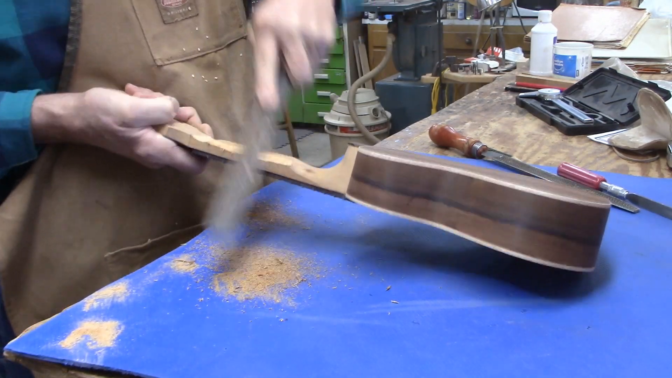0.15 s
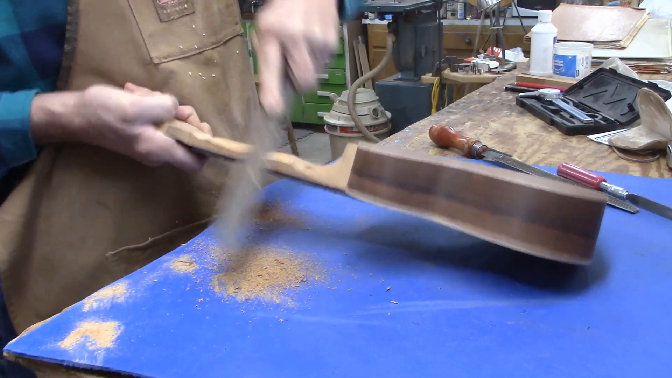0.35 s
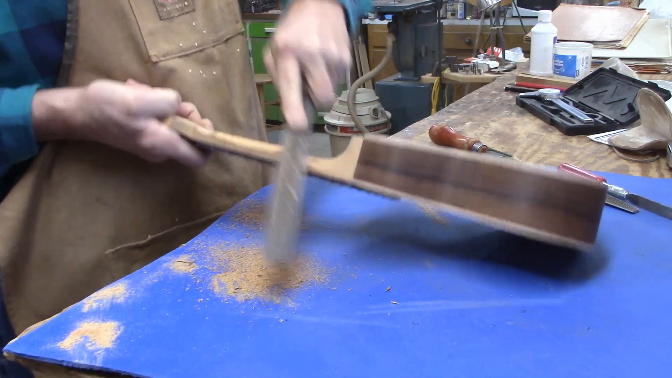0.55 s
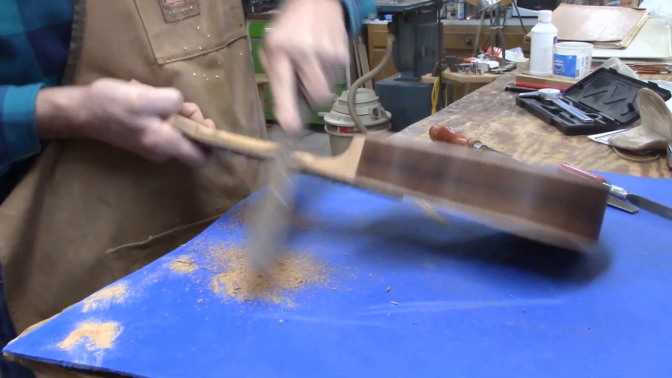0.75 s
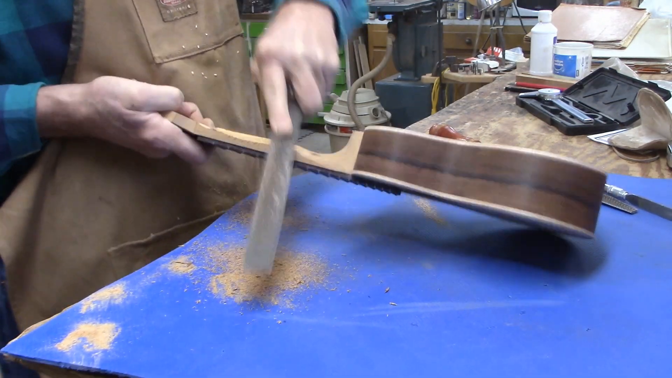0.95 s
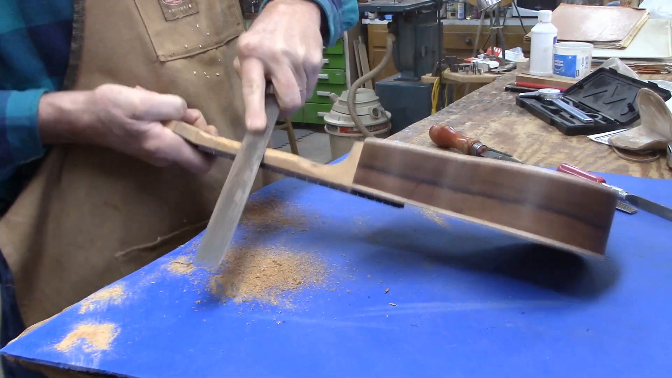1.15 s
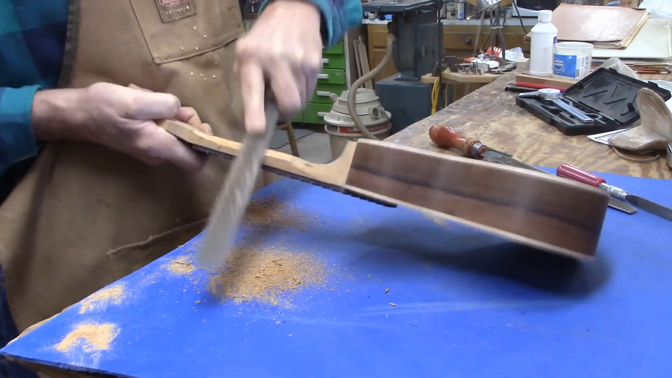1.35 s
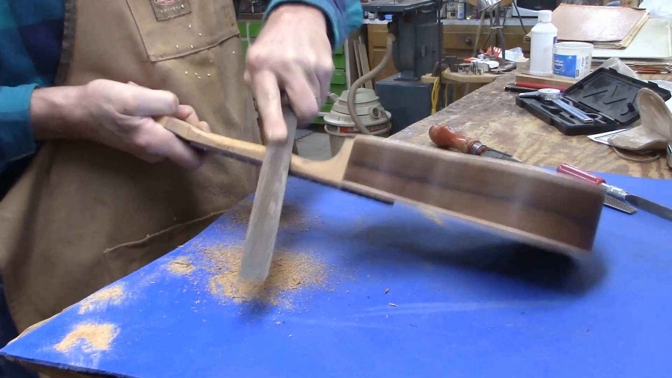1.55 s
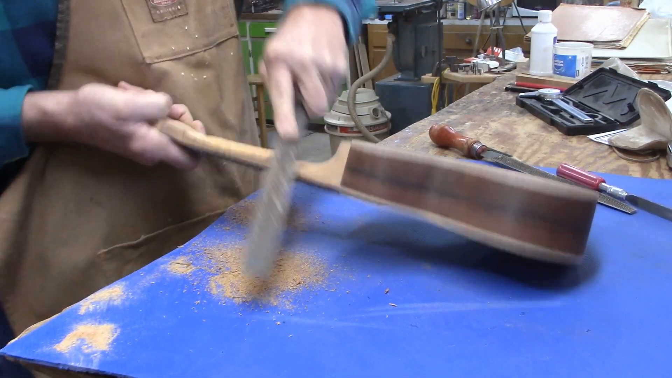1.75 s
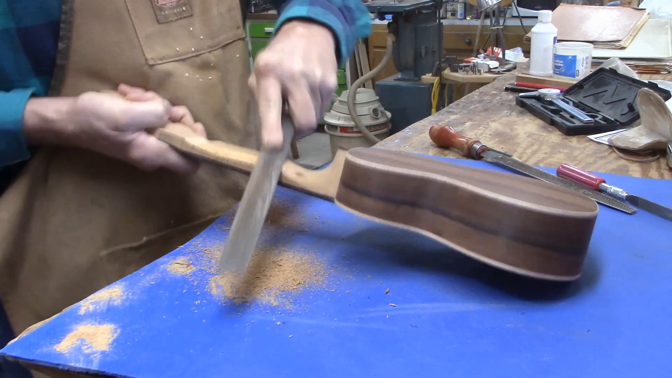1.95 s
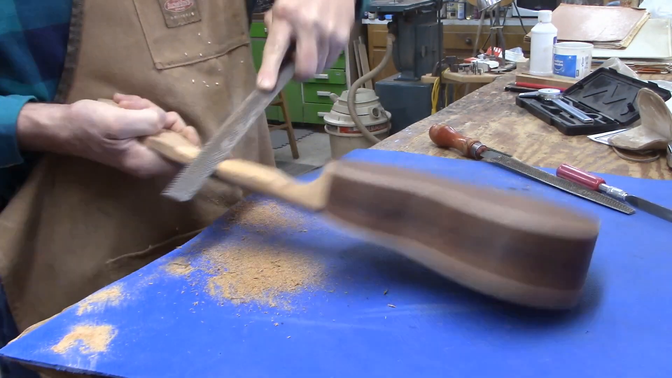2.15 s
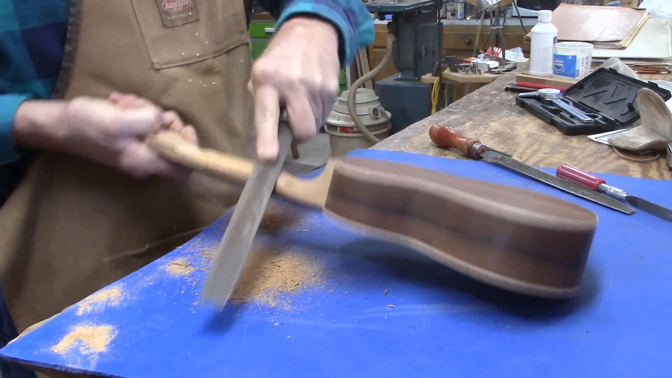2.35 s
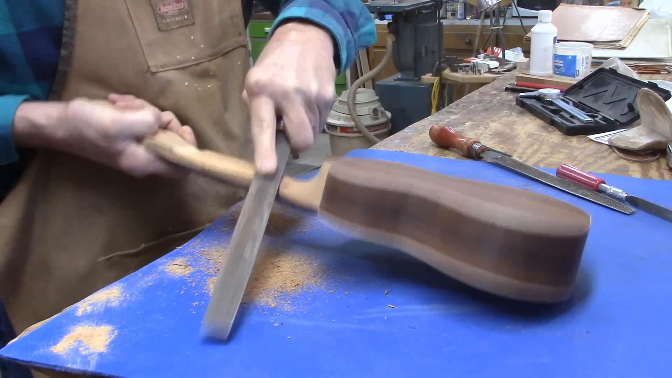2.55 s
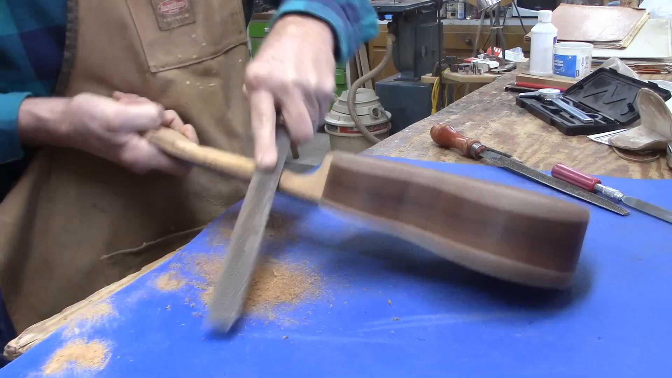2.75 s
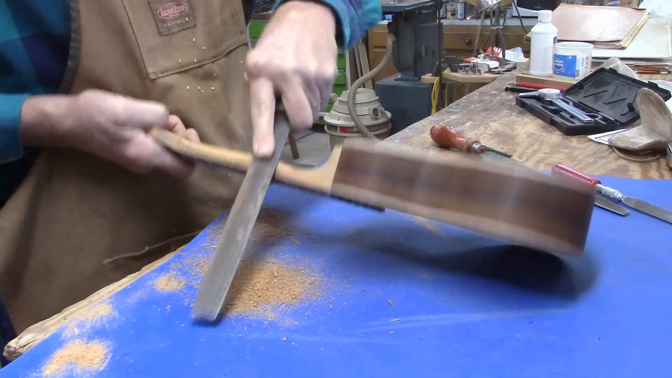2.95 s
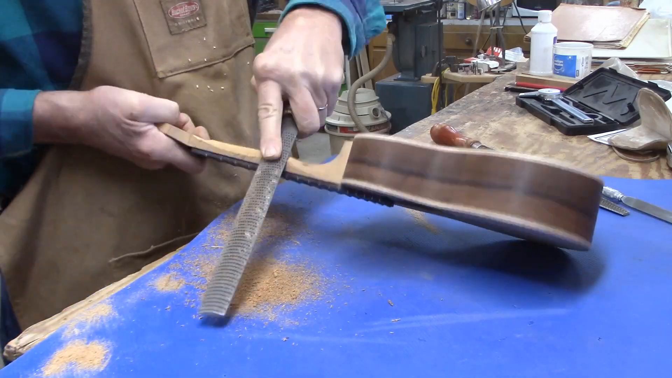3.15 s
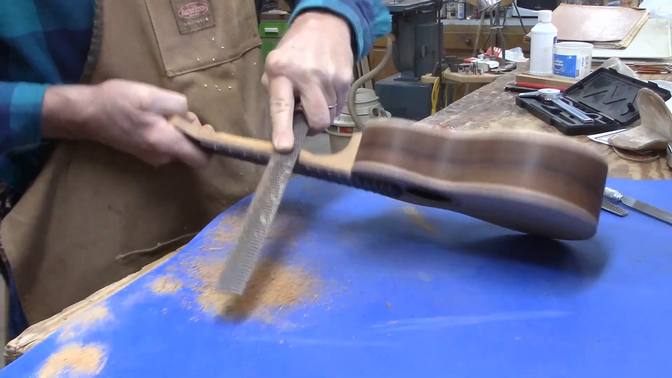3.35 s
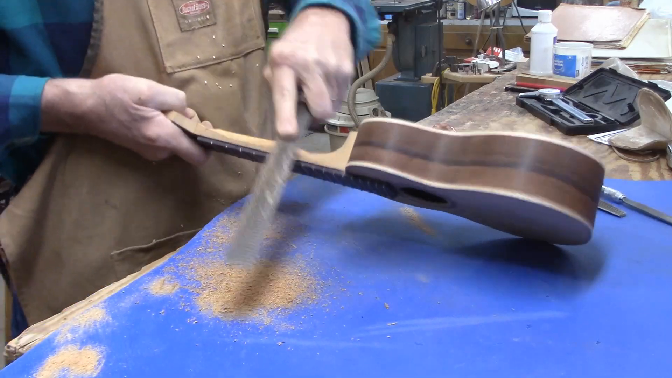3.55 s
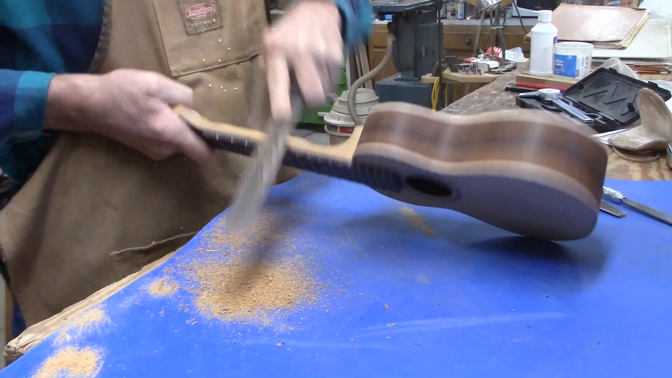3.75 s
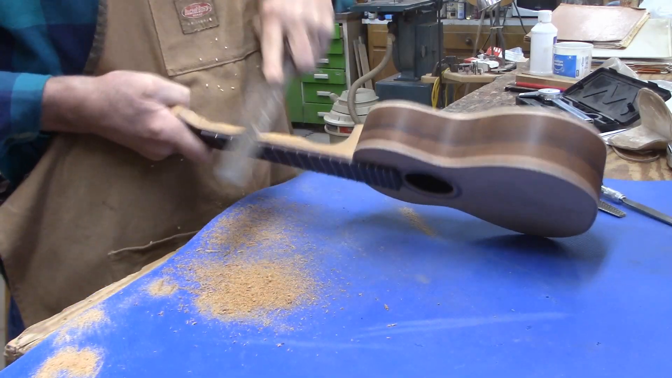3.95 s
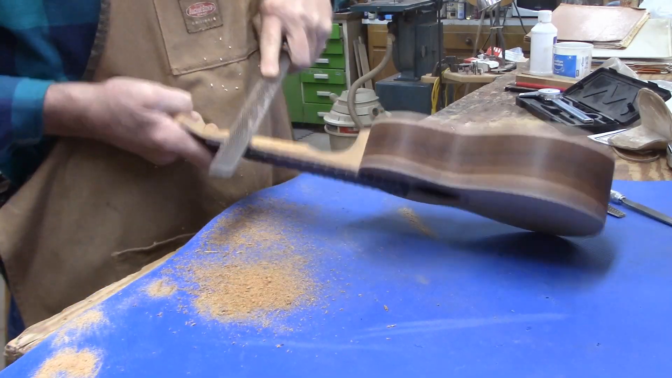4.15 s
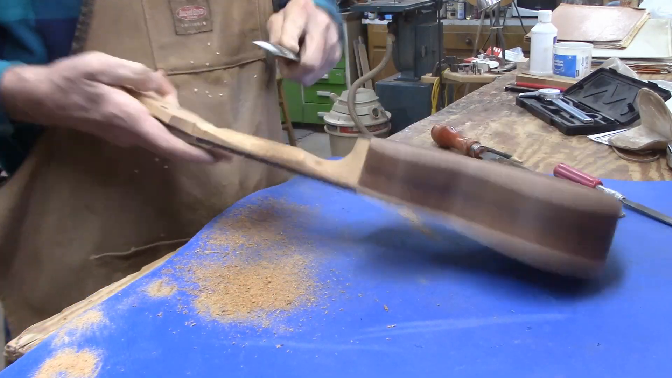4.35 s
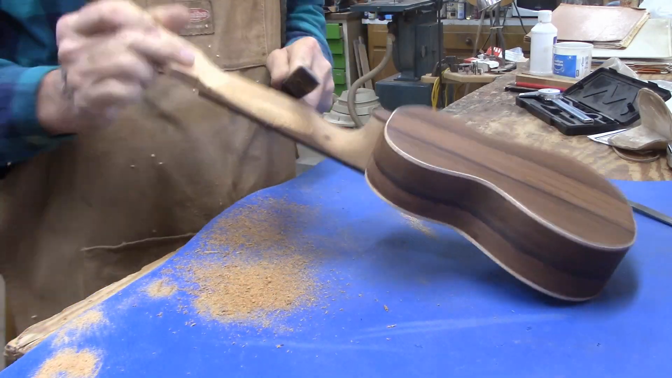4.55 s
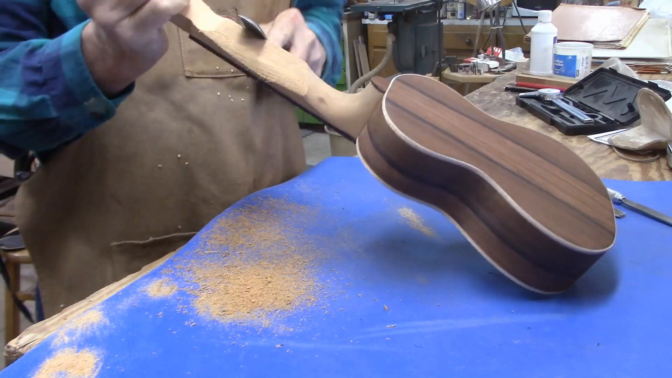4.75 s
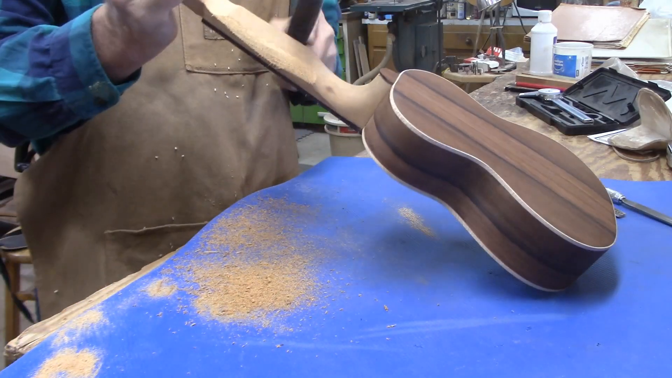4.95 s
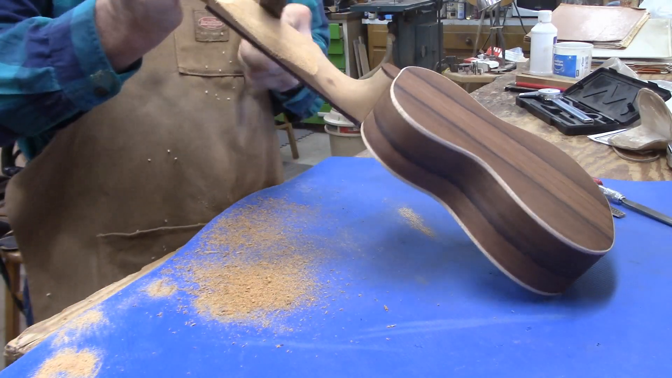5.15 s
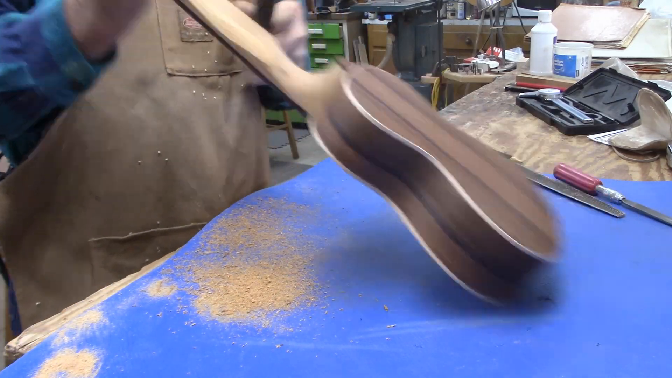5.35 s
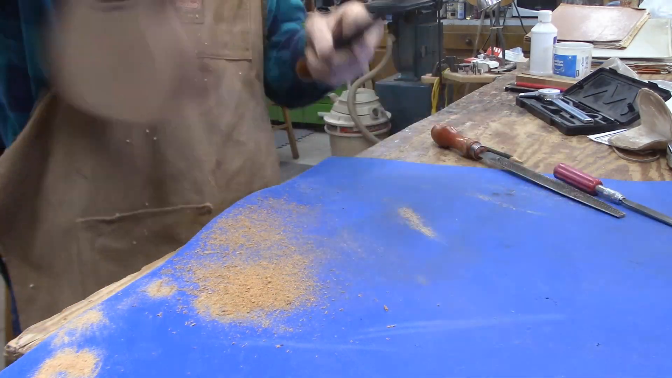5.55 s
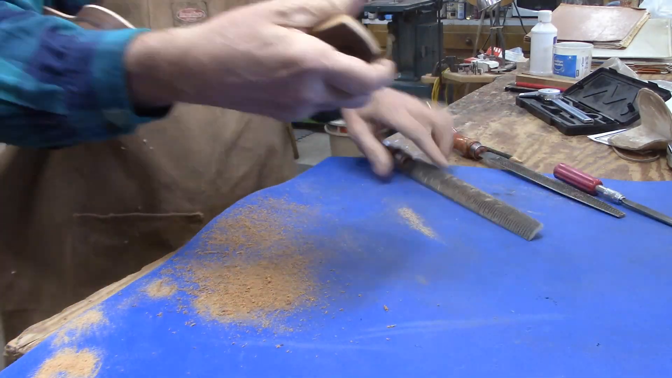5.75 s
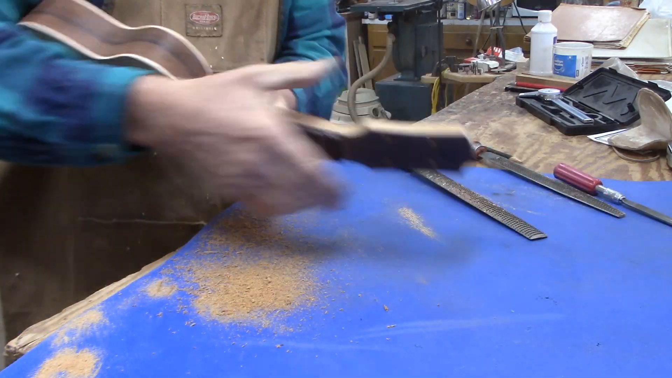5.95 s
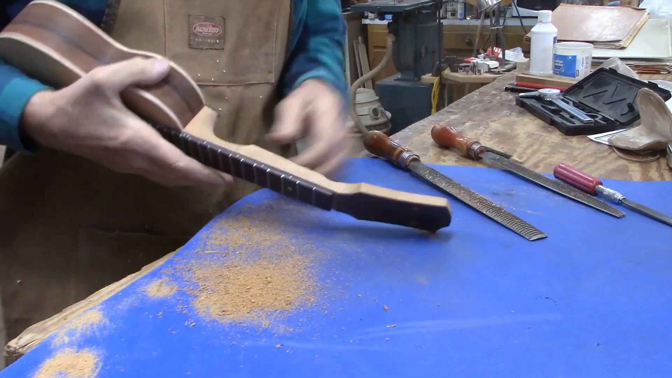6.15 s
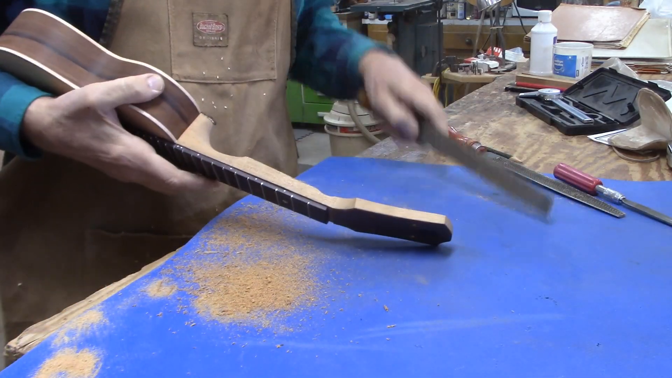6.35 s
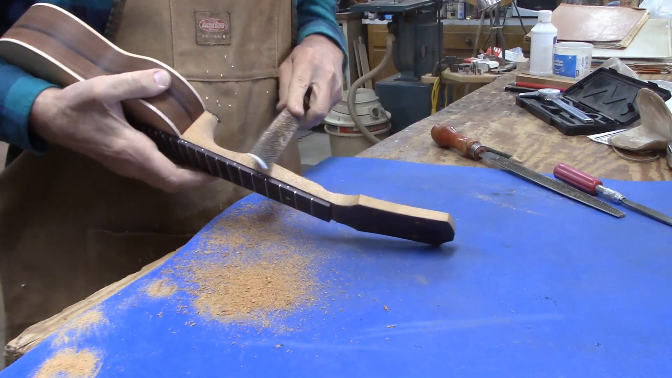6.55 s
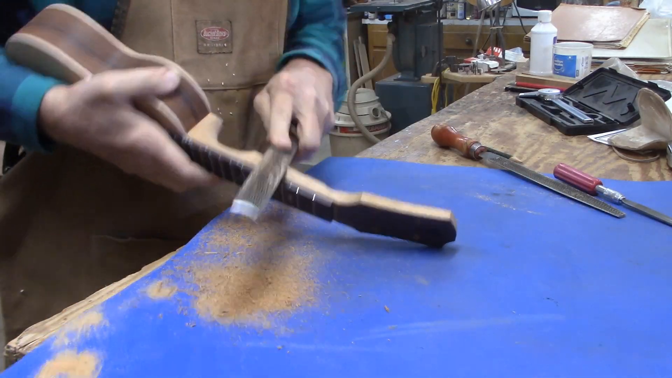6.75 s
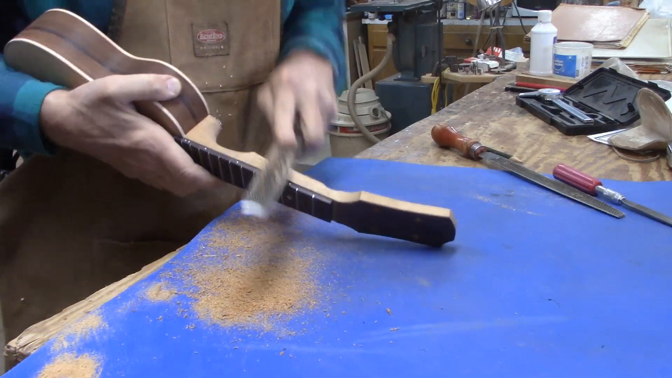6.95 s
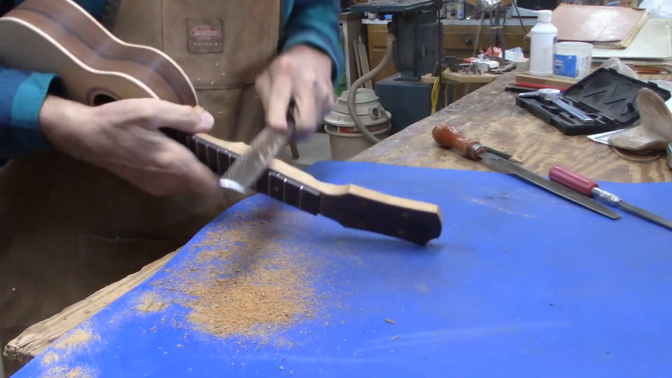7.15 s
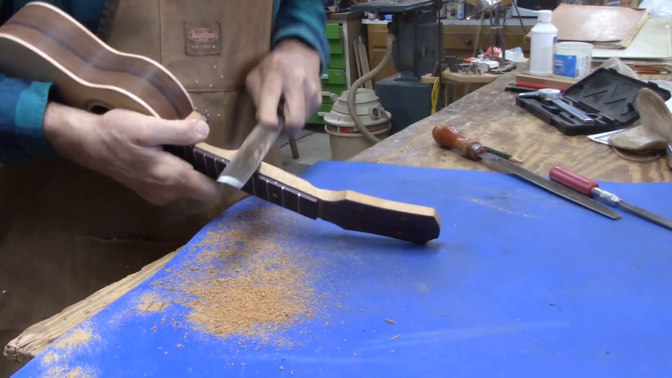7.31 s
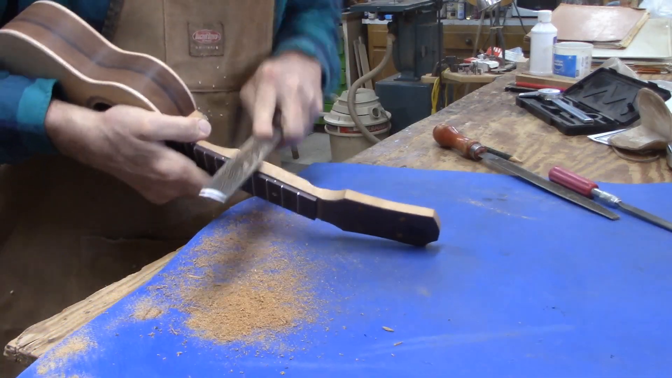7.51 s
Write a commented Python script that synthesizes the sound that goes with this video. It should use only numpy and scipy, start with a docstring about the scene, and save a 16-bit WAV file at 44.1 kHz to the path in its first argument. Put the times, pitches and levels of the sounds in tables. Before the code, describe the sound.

Brisk gritty rasp strokes on wood, about ten a second, stop for handling clunks and soft scuffs, then begin again fainter, with brighter grain.

```python
"""A hand rasp works to and fro across the neck of a small wooden string instrument: tooth rows push,
fibres tear in dense clicks, and resonators ring as neck, hollow body and steel; one light stroke sings.
Then the rasp is lifted: rubs excite the same wood, knocks ring the hollow body, and faint even ticks run.
Midway through this the work is turned over and the resonances change; at last the rasp strokes resume.
A short room echo and the soft noise of a quiet shop lie under it all."""
import sys
import numpy as np
from scipy import signal
from scipy.fft import rfft, irfft
from scipy.io import wavfile
from scipy.ndimage import uniform_filter1d, minimum_filter1d

SR = 44100
rng = np.random.default_rng(int(sys.argv[2]) if len(sys.argv) > 2 else 0)


def to_wav(sig):
    """Store sig (one row per channel, or 1-D mono) as 16-bit WAV at the path in sys.argv[1].

    Samples outside -1..1 are clipped; the rate is SR.
    """
    pcm = np.clip(np.atleast_2d(sig), -1, 1) * 32767
    pcm = np.round(pcm).astype(np.int16)
    wavfile.write(sys.argv[1], SR, pcm.T)  # frames by channels


N = 338688
T = np.arange(N) / SR
TURN_S = 5.65  # the work is turned over
# upper edges of the ranges: air cavity, top plate, neck, coarse grain, fine grain, and the whole sound
AIR_TOP_HZ, BODY_TOP_HZ, NECK_TOP_HZ = 570, 850, 1800
GRAIN_TOP_HZ, CUT_TOP_HZ, TOP_HZ = 3300, 6000, 15800


def undb(db):
    """dB to gain."""
    return 10 ** (np.asarray(db, float) / 20)


def unit(x):
    """Scale to rms 1."""
    return x / np.sqrt(np.mean(x ** 2))


def colour(x, points):
    """Shape a spectrum by (frequency [Hz], level [dB]) points, joined on a log frequency scale."""
    hz, db = np.transpose(points)
    f = np.maximum(np.arange(N // 2 + 1) * SR / N, 1)
    return irfft(rfft(x) * undb(np.interp(np.log(f), np.log(hz), db)), N)


def ring(x, hz, width_hz):
    """One resonance, gain 1 at its centre."""
    return signal.lfilter(*signal.iirpeak(hz, hz / width_hz, fs=SR), x)


def band(x, lo_hz, hi_hz):
    """Steep band-pass."""
    return signal.sosfilt(signal.butter(3, [lo_hz, hi_hz], "bandpass", fs=SR, output="sos"), x)


def walk(rate):
    """Slow chance: random levels, rate per second, joined by straight lines."""
    count = int(T[-1] * rate) + 2
    return 1.2 * np.interp(T * rate, np.arange(count), rng.standard_normal(count))


# Strokes, push and pull in turn, each lasting to the next; very low levels are the rasp off the wood:
# (time [s], cut level as the teeth bite [dB], as the hand eases [dB], air cavity drive [dB],
#  top plate drive [dB])
STROKES = [(-0.075, -15, -27, -31.5, -16), (0.029, -21.5, -24.5, -38, -24),
           (0.131, -16.5, -24.5, -23.5, -21), (0.244, -22.5, -22.5, -37.5, -30),
           (0.344, -18, -27, -38.5, -21.5), (0.453, -22.5, -24, -37, -26),
           (0.563, -14.5, -28.5, -31.5, -27), (0.672, -21, -27, -41, -28.5), (0.762, -17, -26, -27, -23.5),
           (0.876, -21, -24, -40.5, -30), (0.976, -16, -29, -25, -20), (1.08, -20, -26, -41.5, -29),
           (1.182, -17, -26, -24.5, -27.5), (1.288, -23, -24, -35, -41), (1.376, -17.5, -26.5, -25, -26),
           (1.486, -18.5, -27, -41, -34), (1.582, -14.5, -29.5, -27, -24.5),
           (1.689, -24.5, -27.5, -38.5, -34), (1.782, -16.5, -27, -29, -27), (1.884, -18, -23, -38, -27),
           (1.971, -20, -24, -25.5, -29.5), (2.082, -20, -27, -35.5, -26.5),
           (2.189, -38.5, -35, -36, -36.5), (2.311, -36.5, -47, -49, -38.5),
           (2.385, -21, -24, -27.5, -29.5), (2.497, -20, -25.5, -53, -26), (2.589, -18, -24.5, -25, -21),
           (2.697, -18.5, -24.5, -40.5, -23.5), (2.793, -16, -26.5, -29.5, -22.5),
           (2.904, -21.5, -28, -32.5, -26.5), (3.002, -18, -28.5, -28, -24.5),
           (3.113, -22.5, -30, -42, -35.5), (3.202, -20.5, -27, -28.5, -24),
           (3.32, -22.5, -29, -40.5, -34.5), (3.41, -16.5, -24, -27, -24.5), (3.522, -27.5, -29, -42, -39),
           (3.619, -18.5, -25.5, -33.5, -32), (3.734, -25.5, -30, -43.5, -41),
           (3.846, -15, -27.5, -31, -30), (3.963, -24.5, -30, -41, -38.5), (4.07, -17.5, -25.5, -33.5, -31),
           (4.183, -27, -29.5, -39.5, -44.5), (4.283, -15.5, -25.5, -30.5, -24.5),
           (4.41, -69, -70, -94, -93), (6.775, -27, -20.5, -31, -47), (6.946, -29, -30, -25.5, -42),
           (7.039, -21, -22.5, -30, -35), (7.153, -27.5, -30, -29, -45), (7.243, -28.5, -19, -42.5, -47),
           (7.353, -27.5, -30, -26, -48), (7.438, -22.5, -22, -29, -43), (7.537, -28.5, -32, -30, -38),
           (7.616, -20, -19.5, -28, -46.5)]
# End of the last stroke: (time [s], level [dB])
LAST_TURN = (7.72, -34)
# Kinds of stroke, push and pull held by the head, then push and pull held by the body:
# (highest level at the turn before it [dB], share where the teeth bite [0-1], share where the hand
#  eases [0-1], air cavity late minus early [dB], top plate late minus early [dB], neck minus cut
#  early [dB], neck minus cut late [dB], hiss minus cut [dB], tooth-row rate before the speed arch [Hz])
KINDS = [(-49, 0.16, 0.73, -8, 2.5, -9.5, -5, -15, 625), (-37.5, 0.24, 0.66, 6.5, -3, -9.5, -6.5, -14, 615),
         (-46, 0.27, .62, 1.5, -11, -5.5, -5.5, -9, 450), (-46.5, 0.28, 0.62, 1, 7, -5.5, 0, -11.5, 490)]
# Change as the rasp works along the neck: (time [s], coarse minus fine grain trim [dB], neck trim [dB])
DRIFT = [(0, -3, 2.5), (0.601, -0.1, -0.5), (1.8, -2, -0.5), (2.7, -5.5, 2), (3.398, 0.2, -0.5),
         (3.9, 0.5, 2), (4.3, 2, -1), (6.8, -2, 1), (7.1, -7, -0.5), (7.7, -2.5, -1)]
# Resonances while rasping, held by the head:
# (frequency [Hz], width, never used below the least width [Hz], level [dB])
HEAD_GRIP = [(406.3, 18, 5), (652.2, 18, 0), (1146, 34, -3.5), (1493, 97, 1.5), (2045, 140, -11),
             (2187, 22, -8.5), (2480, 59, -16.5), (2747, 38, -4), (2957, 40, -9.5), (3706, 210, -3),
             (3935, 71, -7), (4330, 50, -37), (5355, 92, -9), (5650, 44, -21.5), (6800, 68, -26.5)]
# The same once turned and held by the body:
# (frequency [Hz], width, never used below the least width [Hz], level [dB])
BODY_GRIP = [(397, 147, 1), (1148, 57, -10), (1673, 130, -23.5), (2208, 210, 1), (2755, 33, -2.5),
             (3065, 38, -34), (4050, 150, -20), (4380, 60, 3), (5140, 66, -4.5), (5640, 92, -1.5),
             (6590, 46, -9), (7000, 27, -45), (7830, 41, -15), (7770, 110, -3), (7840, 33, -3.5),
             (8100, 170, -3), (8820, 110, -6), (9630, 120, -29)]
TURN_UNDER_DB = 8.5  # a turn is at least this far under the bite that follows
SHIFT_SHARES = 0.32, 0.35  # air, plate and neck drive go from early to late between these stroke shares


def rasp():
    """Strokes: pressure and speed rise from each turn, hold, and die before the next."""
    s, bite_db, ease_db, air_db, plate_db = np.transpose(STROKES)
    kind = np.arange(len(s)) % 2 + 2 * (s > TURN_S)
    turn, bite, ease, air_late, plate_late, neck_early, neck_late, hiss_db, row_hz = np.array(KINDS)[kind].T
    turn = np.min([turn, bite_db - TURN_UNDER_DB, np.roll(ease_db, 1)], axis=0)
    length = np.diff(np.append(s, LAST_TURN[0]))
    at, grain_db, neck_db = np.transpose(DRIFT)
    grain_db = np.interp(T, at, grain_db)

    def over(shares, values):
        """Join levels in dB set at shares of every stroke into one gain curve."""
        times = np.append((s + length * np.array(shares)).T, LAST_TURN[0])
        return undb(np.interp(T, times, np.append(np.transpose(values), LAST_TURN[1])))

    def shaken(early, late):
        """Drive that moves from an early to a late level within each stroke."""
        a, b = SHIFT_SHARES
        shares = [0 * s, 0.62 * bite, 0 * s + a, 0 * s + b, ease]
        return over(shares, [np.minimum(turn - 6.0, early), early, early, late, late])

    cut = over([0 * s, bite, ease], [turn, bite_db, ease_db])
    air = shaken(air_db - air_late / 2, air_db + air_late / 2)
    plate = shaken(plate_db - plate_late / 2, plate_db + plate_late / 2)
    neck = shaken(bite_db + neck_early, ease_db + neck_late) * undb(np.interp(T, at, neck_db))

    # the hand is fastest about a third of the way along, then slows: the row rate arches and falls
    stroke = np.searchsorted(s, T, side="right") - 1
    share = np.clip((T - s[stroke]) / length[stroke], 0, 1) ** 0.55
    speed = .45 + .75 * np.sin(np.pi * share)
    rows = tooth_rows(np.minimum(row_hz[stroke] * speed, 900), .05, 3.0)
    fibres = tearing(10000, 2.36) * undb(1.62 * walk(80))
    hiss = undb(uniform_filter1d(hiss_db[stroke], size=800))
    # fast fresh teeth cut finer than slowing ones
    dull = undb(4.33 * (uniform_filter1d(share, size=400) - 0.3657))

    # on the pulls held by the head, the blunt backs of the teeth skid with a broad middle hiss
    back = uniform_filter1d((kind[stroke] == 1) * 1., size=400)
    skid = undb(7.0) * ring(ring(cut * back * fibres, 2860, 1000), 2860, 1000)

    coarse = cut * undb(grain_db / 2 - 6.0) * dull * fibres
    fine = cut * undb(-grain_db / 2 - 3.0) / dull * fibres
    grips = HEAD_GRIP, BODY_GRIP
    sound = skid + wood(air * (.12 * rows + .3 * fibres), grips, 250, AIR_TOP_HZ, 7.0, 2.5)
    sound += wood(plate * (0.14 * rows + 0.7 * fibres), grips, AIR_TOP_HZ, BODY_TOP_HZ, 5.1, 3.0)
    sound += wood(neck * (0.021 * rows + 0.93 * fibres), grips, BODY_TOP_HZ, NECK_TOP_HZ, -2.9, 2.5)
    sound += wood(coarse, grips, NECK_TOP_HZ, GRAIN_TOP_HZ, 0.43, 3.0)
    sound += wood(fine, grips, GRAIN_TOP_HZ, CUT_TOP_HZ, 8.4, 3.0)
    sound += wood(cut * hiss * fibres, grips, CUT_TOP_HZ, TOP_HZ + 600, 1.8, 3.0)
    return sound, cut


def tooth_rows(hz, jitter, scatter_db):
    """One blunt push for each row of teeth that crosses the wood."""
    phase = np.cumsum(hz * (1 + jitter * walk(120))) / SR
    size = undb(scatter_db * rng.standard_normal(N // 20))
    return unit(size[phase.astype(int)] * np.sin(np.pi * phase) ** 6 * np.sin(2 * np.pi * phase))


def tearing(rate, scatter_db):
    """Dense clicks of unequal size, rate per second: fibres that break under the teeth."""
    on = rng.random(N) < rate / SR
    size = undb(scatter_db * np.minimum(rng.exponential(size=N), 3))
    return unit(on * rng.standard_normal(N) * size)


# Broad response of the wood between its resonances: (frequency [Hz], relative level per Hz [dB])
SCRAPE = [(200, -58), (320, -10), (900, -16.5), (1800, -19), (4500, -11), (6000, -21.5), (6700, -18.5),
          (8000, -14.5), (10000, -21), (13000, -19), (16500, -19)]


def wood(force, grips, lo_hz, hi_hz, between_db, wander_db):
    """A force heard through one range of resonances; the contact point moves, so each is driven unevenly."""
    impulse, turn = (np.arange(N) == N // 2) * 1., int(TURN_S * SR)
    out, response = [undb(between_db) * band(colour(x, SCRAPE), lo_hz, hi_hz) for x in (force, impulse)]
    for modes, part in zip(grips, (slice(0, turn), slice(turn, N))):
        power = np.sum(response ** 2)
        for k, (hz, width, db) in enumerate(modes):
            if lo_hz <= hz < hi_hz:
                least_width = max(30, hz / 50)  # no ring is narrower than this, in Hz
                width = max(width, least_width)
                drive = force[part] * undb(db + wander_db * walk(14)[part])
                out[part] += (-1) ** k * ring(drive, hz, width)
                power += undb(2 * db) * np.pi * width / SR
        out[part] /= np.sqrt(power)  # even out the gain of the whole range
    return out


# One light stroke where the tooth rows sing clearly:
# (time [s], row rate [Hz], partial 1 [dB], partial 2 [dB], partial 3 [dB], partial 4 [dB])
SQUAWK = [(2.194, 487.2, -64, -64, -33, -59), (2.211, 494, -29.5, -36, -25, -57),
          (2.227, 560, -27.5, -27.5, -31.5, -40), (2.26, 487, -38, -66.5, -48.5, -60)]


def squawk():
    """Even tooth rows heard as a short gliding tone."""
    s, hz, *levels = np.transpose(SQUAWK)
    phase = 2 * np.pi * np.cumsum(np.interp(T, s, hz) * (1 + .025 * walk(250))) / SR
    out = np.zeros(N)
    for k, db in enumerate(levels):
        level = undb(np.interp(T, s, db, left=-120, right=-120))
        out += np.sqrt(2) * level * np.sin((k + 1) * phase)
    return out


# Resonances with the rasp lifted, before the turn:
# (frequency [Hz], width, never used below the least width [Hz], level [dB])
HEAD_LOOSE = [(657, 30, -4.5), (1180, 36, -6), (1490, 37, -7.5), (1718, 19, 0), (2035, 33, -1.5),
              (2220, 77, -6), (2762, 45, -1.5), (2990, 150, -0.5), (3500, 47, -8), (3860, 100, 0),
              (4600, 190, -18), (4790, 40, -9), (5200, 45, -14), (5500, 18, -44), (6730, 43, -19),
              (6370, 17, -43), (7540, 42, -19), (8280, 100, -15), (8340, 200, -14), (8600, 65, -21)]
# The same after the turn:
# (frequency [Hz], width, never used below the least width [Hz], level [dB])
BODY_LOOSE = [(360, 34, -15), (1088, 22, -12), (1690, 29.5, -23), (1900, 74, -27)]


def loose():
    """With the rasp lifted, rubs and knocks ring neck, steel and body."""
    grain, body, neck, hiss = handling()
    rub = tearing(18000, 1.0) * undb(2.0 * walk(40))
    grain_blow, neck_blow, hollow = knocks(rub)
    grips = HEAD_LOOSE, BODY_LOOSE
    sound = 0.07 * hollow + wood(0.54 * body * rub + 0.31 * neck_blow, grips, 230, BODY_TOP_HZ, -1.0, 3.0)
    sound += wood(0.79 * neck * rub + 2.0 * neck_blow, grips, BODY_TOP_HZ, NECK_TOP_HZ, 5.8, 1.2)
    sound += wood(0.79 * grain * rub + grain_blow, grips, NECK_TOP_HZ, CUT_TOP_HZ, 6.7, 3.0)
    sound += wood(0.78 * hiss * rub + 0.22 * grain_blow, grips, CUT_TOP_HZ, TOP_HZ + 600, -7.5, 3.0)
    return sound


# Hands and tool sliding over the work: (time [s], length between attack and release [s],
#  grain drive [dB], body minus grain [dB], neck minus grain [dB], hiss minus grain [dB])
RUBS = [(4.395, 0.082, -45, -8, -7, -4), (4.523, 0.21, -49.5, -1.5, -4.5, -7),
        (4.721, 0.03, -43.5, 8.5, -2, -11.5), (4.77, 0.1, -48.5, -1, 5, -3),
        (4.94, 0.022, -48, -19, -8.5, -5.5), (5.167, 0.007, -38.5, 6, -2, -8.5),
        (5.19, 0.069, -55, -3, 0.5, -6), (5.304, 0.021, -41, 7, 1, -12), (5.321, 0.022, -27.5, 2.5, 1, -13),
        (5.34, 0.027, -26.5, -3.5, 1.5, -10), (5.422, 0.067, -47, -2, 2, -0.5),
        (5.48, .08, -48.5, -17, -2, -1), (5.58, 0.11, -70, -12, -2, 4), (5.703, 0.038, -48.5, -20, 0, -2),
        (5.83, 0.023, -59.5, 15, 9, 6), (5.863, 0.023, -54, -18, -1, 7), (5.898, 0.067, -55.5, 23, 7.5, 0),
        (5.988, .1, -52.5, -9, -3, -0.5), (6.134, 0.095, -53.5, -17, -6, 1.5),
        (6.236, .11, -50.5, -6, -7, -2), (6.373, 0.064, -54.5, 7, 3.5, 5.5), (6.47, 0.19, -66, -10, -6, 4),
        (6.658, 0.017, -48, 7, 1, -15), (6.691, 0.082, -48, 4.5, 4, -11), (6.785, 0.051, -33, -5, 1, -11)]
RUB_ATTACK_S, RUB_RELEASE_S, RUB_SAG_DB = 0.0051, 0.029, -8.5


def handling():
    """Each rub sets in, sags and lets go; how hard it drives grain, body, neck and hiss."""
    out = np.zeros((4, N))
    for s, length, db, *other_db in RUBS:
        times = s + np.cumsum([0, RUB_ATTACK_S, length, RUB_RELEASE_S])
        part = slice(int(s * SR), int(times[-1] * SR))
        shape = np.interp(T[part], times, [0, 1, undb(RUB_SAG_DB), 0])
        out[:, part] += np.outer(undb(db + np.array([0, *other_db])), shape)
    return out


# Knocks: (time [s], blow drive [dB], hollow body drive [dB])
KNOCKS = [(4.4324, -43, -39), (4.5254, -41, -43.5), (4.5444, -53, -42), (4.7167, -24, -38),
          (4.744, -26, -49), (4.8625, -29, -43), (4.9407, -35, -63), (5.025, -49, -72),
          (5.1665, -21.5, -36), (5.302, -36, -42), (5.323, -26, -30), (5.3494, -26, -33),
          (5.3894, -26, -51), (5.706, -43, -62), (5.831, -39, -32.5), (5.8983, -36.5, -25),
          (5.9234, -44, -39), (5.959, -44, -35), (6.134, -54, -63), (6.2849, -43, -38.5),
          (6.3668, -42, -57), (6.3773, -43, -51), (6.3983, -41, -38), (6.6559, -35.5, -36.5),
          (6.6997, -48, -44), (6.7359, -34, -37.5)]
# Modes of the hollow body when knocked: (frequency [Hz], relative level [dB], 60 dB decay time [s])
HOLLOW = [(350, -9, 0.048), (406.6, -13.5, 0.22), (553, 0, 0.035), (653, -1.5, 0.054), (824, -36, 0.11),
          (1180, 8, 0.023), (1700, -20, .2), (2000, -15, .1)]
RATTLE_T60_S, CONTACT_MS = 0.048, .52
NECK_BLOW_DB, NECK_FOLLOWS = -3.5, 0.39  # a knock that rings the hollow also shakes the neck [dB, dB per dB]


def knocks(rub):
    """Each knock: a tick and a dying rattle on grain and neck, and a push that rings the hollow body."""
    grain, neck, push = np.zeros((3, N))
    age = np.arange(int(.2 * SR)) / SR
    contact = CONTACT_MS * SR / 1000  # in samples
    for at, blow_db, hollow_db in KNOCKS:
        i = int(at * SR)
        part = slice(i, i + len(age))
        rattle = 0.11 * rub[part] * undb(-60 * age / RATTLE_T60_S)
        blow = undb(blow_db) * (rattle + 4.4 * (age == 0))
        grain[part] += blow
        neck[part] += undb(NECK_BLOW_DB + NECK_FOLLOWS * (hollow_db - blow_db)) * blow
        bump = np.exp(-.5 * ((age * SR - 2 * contact) / (.5 * contact)) ** 2)
        push[part] += undb(hollow_db) * bump / contact
    hollow = np.zeros(N)
    for hz, db, t60 in HOLLOW:
        hollow += undb(db) * ring(push, hz, np.log(1000) / np.pi / t60) * t60 * SR
    return grain, neck, hollow


# Runs of faint even ticks: (start [s], end [s], peak level [dB])
TICKS = [(5.053, 5.15, -49), (5.609, 5.65, -49), (5.775, 5.815, -51), (6.551, 6.64, -50)]
TICK_HZ, TICK_WIDTH_HZ, TICK_GAP_S = 4400, 500, .027


def ticks():
    """Faint, evenly spaced ticks: single impulses through a short high ring."""
    hits = np.zeros(N)
    for start, end, db in TICKS:
        at = (np.arange(start, end, TICK_GAP_S) * SR).astype(int)
        hits[at] = undb(db) * SR / TICK_WIDTH_HZ / (2 * np.pi)  # offsets the filter's low impulse peak
    return ring(hits, TICK_HZ, TICK_WIDTH_HZ)


def low_noise(cut):
    """Low noise of randomly wandering level follows all the strokes, stronger before the turn."""
    level = undb(-46.5 + 12 * walk(12) - 20.9 * (T > TURN_S))
    return cut ** 2 * level * unit(band(rng.standard_normal(N), 30, 280))


def tail(t60):
    """A decaying noise echo tail of energy 1, after a short gap."""
    age = np.arange(int(.4 * SR)) / SR
    h = rng.standard_normal(len(age)) * undb(-60 * age / t60) * (age > t60 / 60)
    return h / np.sqrt(np.sum(h ** 2))


# Colour of the quiet shop: (frequency [Hz], relative level per Hz [dB])
SHOP = [(18, -53), (30, -37), (252, 3), (616, -7.5), (962, 1.5), (1590, -9), (4300, -8), (5740, -17.5),
        (14800, -13.5), (16000, -26)]


def hush():
    """The shop's hush: shaped noise near -66 dB that drifts slowly."""
    return undb(-66 + 1.0 * walk(6.28)) * unit(colour(rng.standard_normal(N), SHOP))


# Stereo spread of the work: (frequency [Hz], side minus mid [dB])
WIDTH = [(60, 0), (110, -12), (200, -6), (380, -28.5), (700, -27.5), (1290, -31), (2380, -32), (4400, -22),
         (8120, -16.5), (15000, -9)]
MIC_LOW_HZ = 225
ROOM_T60_S, ROOM_DB = 0.15, -7


def scene():
    """Rasp and handling, their echo in the shop and the hush, spread to left and right."""
    strokes, cut = rasp()
    near = strokes + squawk() + loose() + ticks()
    # steep low cut on the close sound, as of a microphone's bass filter
    near = signal.sosfilt(signal.butter(4, MIC_LOW_HZ, "highpass", fs=SR, output="sos"), near)
    mid = near + undb(ROOM_DB) * signal.fftconvolve(near, tail(ROOM_T60_S))[:N]
    mid += low_noise(cut)
    side = colour(signal.fftconvolve(mid, tail(0.1))[:N], WIDTH)
    mid += hush()
    side += .5 * band(hush(), 400, 16000)
    return np.array([mid + side, mid - side])


LIMIT_DB = -12  # peaks above this are eased down


def record(dry):
    """A quick limiter eases the peaks down, then the top is cut."""
    peak = -minimum_filter1d(-np.abs(dry).max(axis=0), size=90)
    gain = uniform_filter1d(np.minimum(1, undb(LIMIT_DB) / (peak + 1e-9)) ** 0.69, size=90)
    return signal.sosfilt(signal.ellip(10, .2, 80, TOP_HZ, fs=SR, output="sos"), dry * gain)


dry = scene()
out = record(dry)
to_wav(out)
```